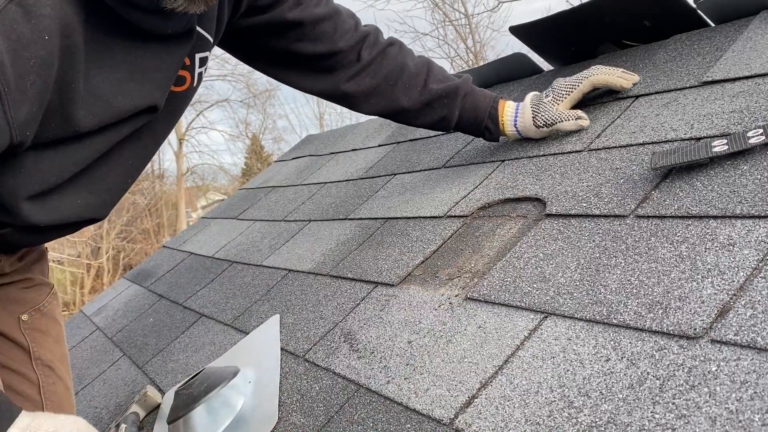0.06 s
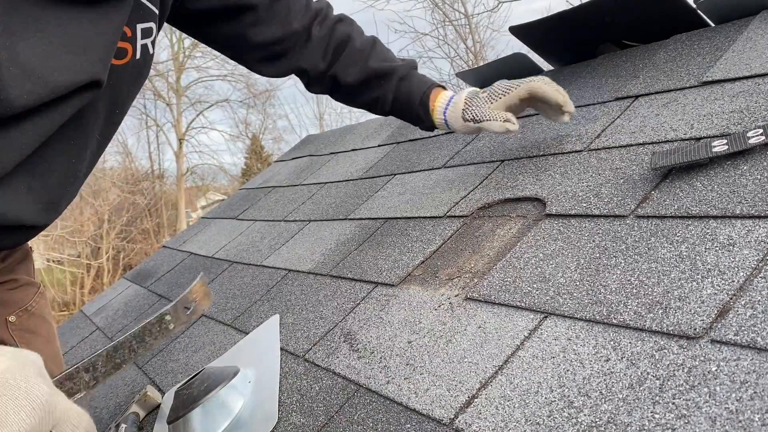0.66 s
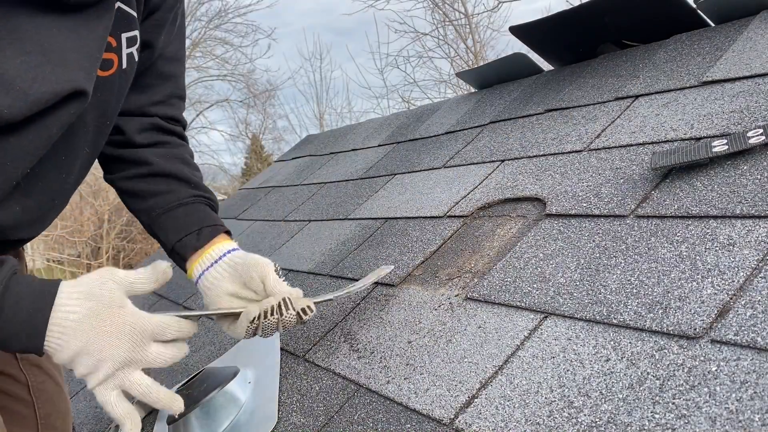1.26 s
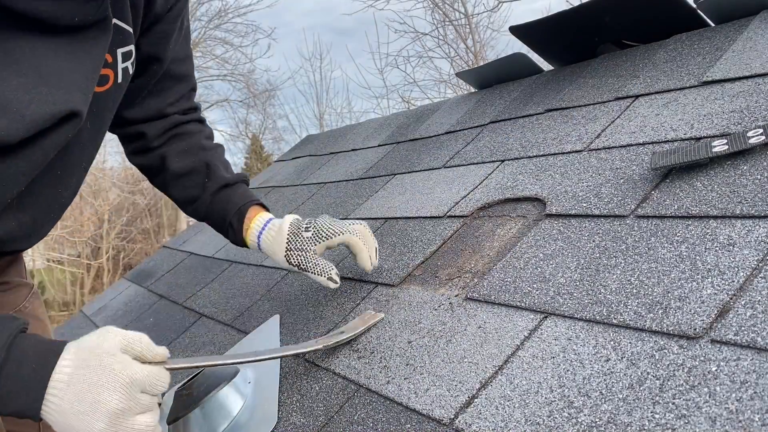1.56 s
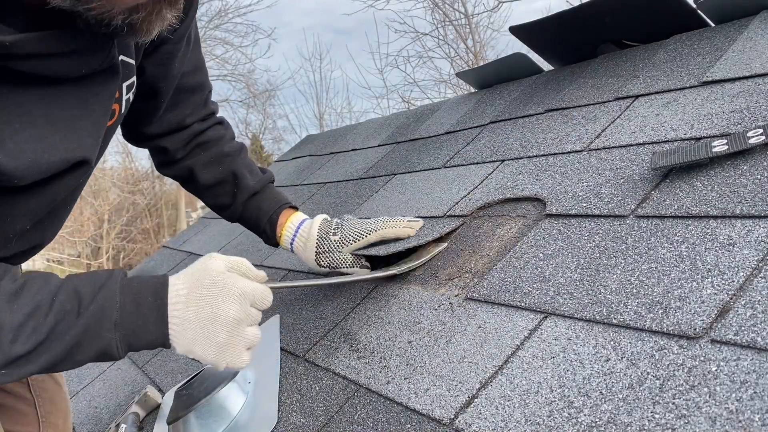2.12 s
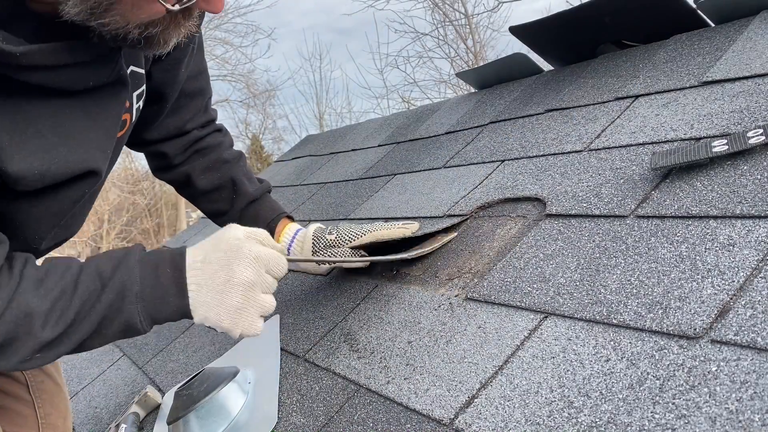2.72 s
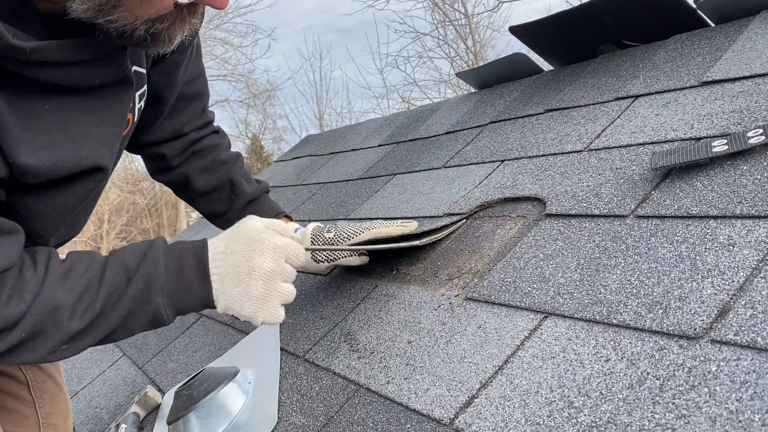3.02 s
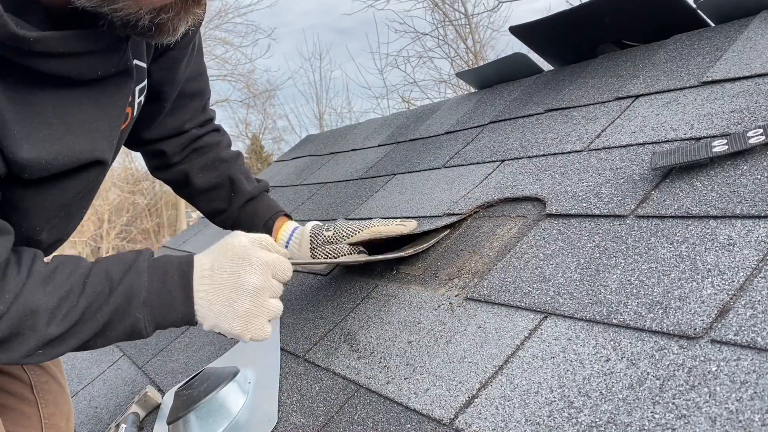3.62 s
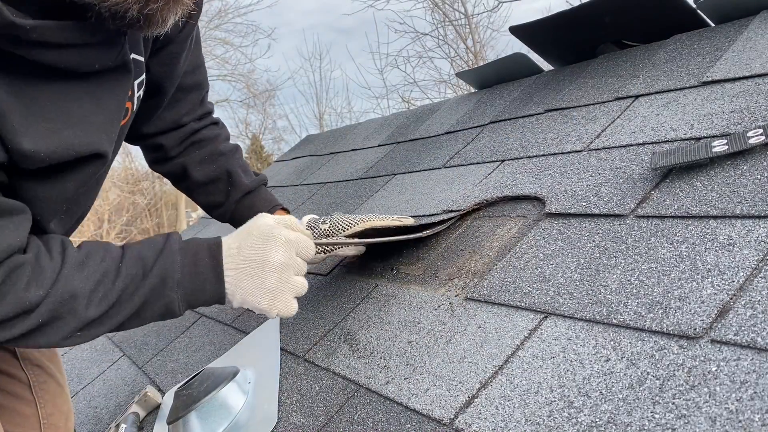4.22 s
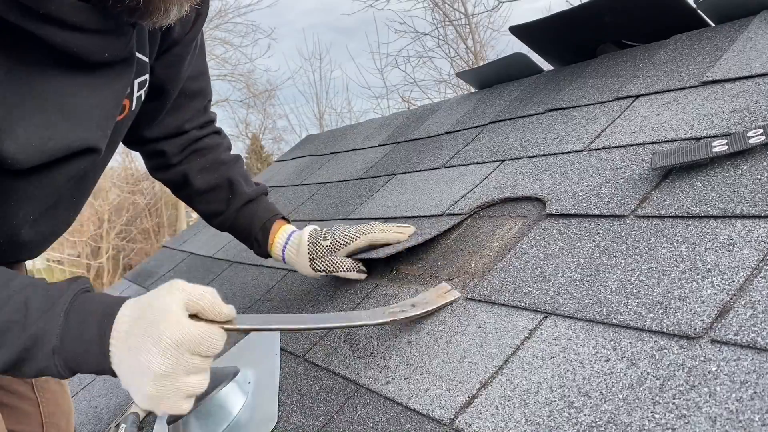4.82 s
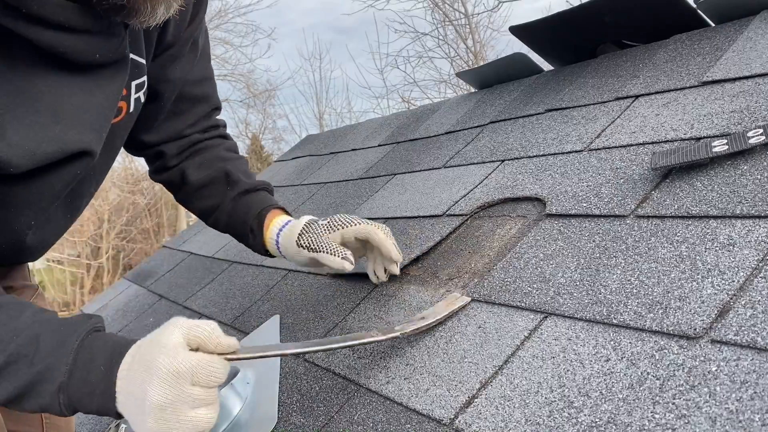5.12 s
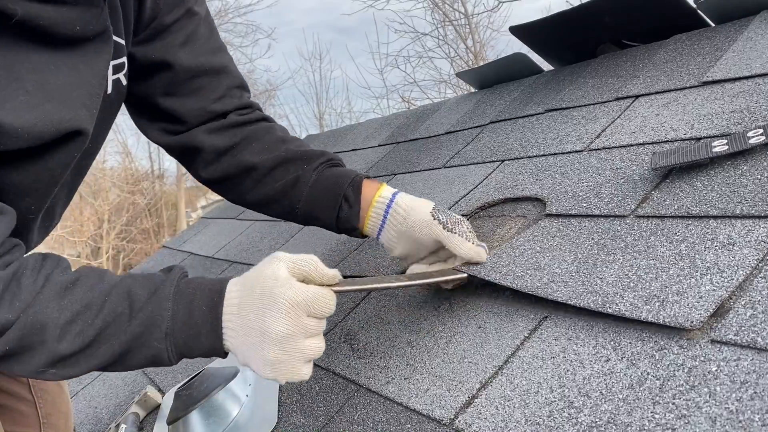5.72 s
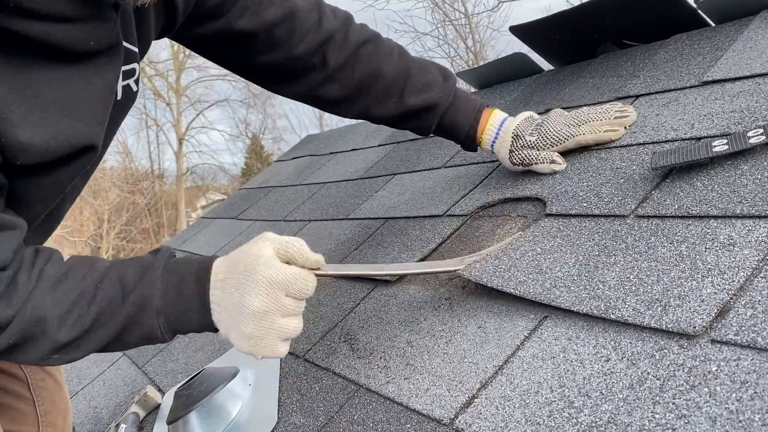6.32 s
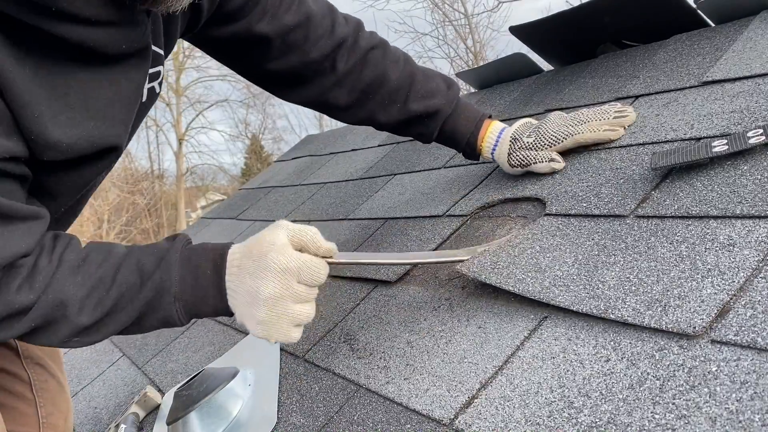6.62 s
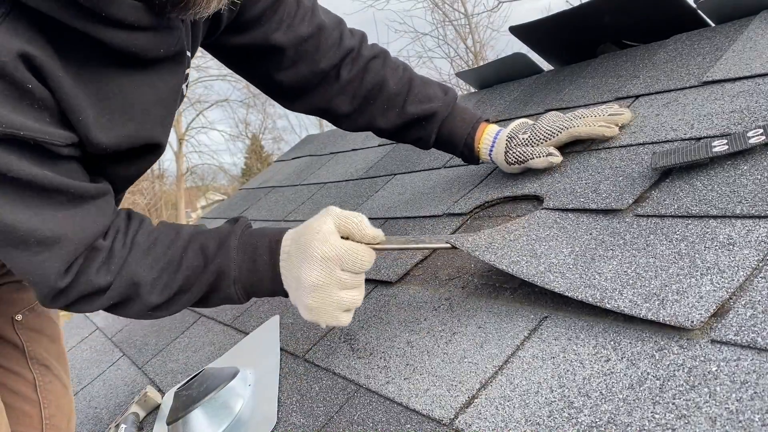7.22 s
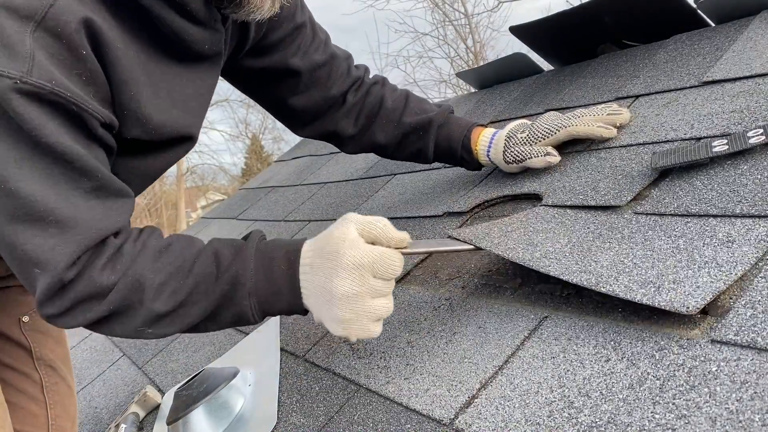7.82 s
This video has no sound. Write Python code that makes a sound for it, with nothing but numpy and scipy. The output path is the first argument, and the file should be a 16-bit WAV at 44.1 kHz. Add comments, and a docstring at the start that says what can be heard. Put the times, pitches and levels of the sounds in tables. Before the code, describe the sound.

For the first second there is only a soft sleeve rustle and a few ticking granules over a faint outdoor rumble. At about 1.3 seconds a flat steel pry bar clinks lightly onto the roof several times and starts to slide. From 2.2 seconds it is worked in and out under an asphalt shingle, close by, in short gritty strokes, about three or four pushes a second. Pushes are louder and rise in pitch; pulls are softer and fall. Sharp cracks and dull knocks break through between 2.9 and 4.5 seconds, the sharpest near 4.2, while the wooden boards thud low underneath. The scraping eases around 5 seconds, with a few bumps. From 5.5 seconds the bar rasps under a looser shingle, thinner and brighter, with more snaps near 7 and 7.5 seconds, continuing until the end at about 8 seconds.

```python
"""A sleeve rustles and stray granules tick over faint outdoor rumble; then a flat steel pry bar clinks
onto a roof and is worked in and out under one asphalt shingle and its looser neighbour, close by.
Each stroke swells and fades as granules grind by stick-slip friction and snap under the blade.
A push shortens the air pocket ahead of the tip, so its pitch rises, and loads the wooden deck;
a pull lets the pitch fall."""
import sys
import numpy as np
from scipy import signal
from scipy.fft import rfft, irfft, next_fast_len
from scipy.io import wavfile
from scipy.ndimage import uniform_filter1d

SR = 44100
rng = np.random.default_rng(int(sys.argv[2]) if len(sys.argv) > 2 else 0)


def int16_out(signal):
    """Quantize to a 16-bit WAV file."""
    q = np.round(np.clip(np.atleast_2d(signal).T, -1, 1) * 32767)
    wavfile.write(sys.argv[1], SR, q.astype(np.int16))


N = 346626
TIME = np.arange(N) / SR
ARM_TIME = TIME[::32]  # a slow clock for the arm's movements


def amp(db):
    """Decibels to amplitude gain."""
    return 10 ** (np.asarray(db) / 20)


def unit(x):
    """Normalisation to rms 1."""
    return x / np.sqrt(np.mean(x ** 2) + 1e-20)


def smooth(x, size):
    """A moving average over size samples, taken twice."""
    return uniform_filter1d(uniform_filter1d(x, size), size)


def steady(x, size):
    """Division by the running rms holds the level near 1."""
    return x / np.sqrt(abs(smooth(x ** 2, size)) + 1e-9)


def curves(rows):
    """Linear interpolation of a time table's columns at every sample."""
    times, *columns = np.transpose(rows)
    order = np.argsort(times)
    return [np.interp(TIME, times[order], column[order]) for column in columns]


def spectrum_at(points, hz):
    """Interpolation of a spectrum on a log-frequency axis."""
    frequencies, db = np.transpose(points)
    return np.interp(np.log(hz + 1), np.log(frequencies), db)


def add(mix, start_s, sound):
    """Superposition of a sound on the mix."""
    part = mix[max(round(start_s * SR), 0):][:len(sound)]
    part += sound[:len(part)]


def colour(x, points, size=2048):
    """A minimum-phase filter of unit energy imposes the shape of a spectrum."""
    log_gain = np.log(amp(spectrum_at(points, abs(np.fft.fftfreq(size, 1 / SR)))))
    response = np.exp(np.conj(signal.hilbert(log_gain)))
    taps = np.fft.ifft(response).real[:size // 2]
    return signal.oaconvolve(x, taps / np.linalg.norm(taps))[:len(x)]


def resonate(x, hz, width_hz):
    """A damped resonator of gain 1 whose frequency may glide."""
    turn = np.exp(2j * np.pi * np.cumsum(hz * np.ones(len(x))) / SR)
    pole = np.exp(-np.pi * width_hz / SR)
    return 2 * (turn * signal.lfilter([1 - pole], [1, -pole], x / turn + 1e-18)).real


def swell(crest_s, rise_s, fall_s, edge_db=-30, roundness=1.82):
    """Power envelope of a movement, at edge_db one rise before its crest and one fall after."""
    since = ARM_TIME - crest_s
    distance = abs(since / np.where(since < 0, rise_s, fall_s))
    return amp(edge_db * distance ** roundness) ** 2


def decibels(power):
    """Power on the slow clock to dB at every sample."""
    return np.interp(TIME, ARM_TIME, 10 * np.log10(power + 1e-12))


def stick_slip(per_s=10000, spread_db=2.0, clump_db=3.5, dust=0.18, lurch_db=4.0):
    """Stick-slip friction: clicks of unequal size, in quick clumps and slower lurches."""
    sizes = amp(spread_db * np.minimum(rng.exponential(1, N), 4.3)) * rng.choice([-1., 1.], N)
    clicks = unit(sizes * (rng.random(N) < per_s / SR)) + dust * rng.standard_normal(N)
    clumps = unit(smooth(rng.standard_normal(N), size=70))
    lurches = unit(smooth(rng.standard_normal(N), size=500))
    return steady(clicks * amp(clump_db * clumps), size=600) * amp(lurch_db * lurches)


# Spectrum of the open air. Each row: frequency in Hz, relative level in dB.
AIR_SPECTRUM = [(20, -14), (60, 2), (110, -14), (200, -8), (450, -22.5), (800, -21.5), (1400, -35),
                (2500, -50), (15000, -53.5)]

def outdoors(level_db=-51.5, apart=0.7):
    """Distant rumble is partly coherent between the ears: a common noise plus an opposed one."""
    common, side = (unit(colour(noise, AIR_SPECTRUM, size=8192)) for noise in rng.standard_normal((2, N)))
    return amp(level_db) * np.array([common + apart * side, common - apart * side])


# The worker's shifting weight. Each row: time in seconds, load on the boards in dB.
LEANING = [(0, -45.5), (.38, -40.5), (.5, -51.5), (1.3, -52.5), (1.5, -37), (1.8, -41), (1.95, -29.5),
           (2.12, -41.5), (2.35, -48), (4.6, -49.5), (4.85, -26.5), (5.05, -45.5), (5.5, -42.5),
           (5.68, -35.5), (5.95, -51), (6.7, -43), (7.1, -49), (7.86, -41.5)]
# A knee or hand comes down. Each row: crest in seconds, load in dB.
THUDS = [(0.205, -38.5), (1.367, -35), (1.5, -29.5), (4.02, -24), (4.264, -28.5), (5.131, -34.5)]

def deck_load(push_lag_s=0.01, pull_lag_s=0.047, stretch=1.295):
    """Incoherent sources add in power: weight, strokes and thuds give the load on the boards in dB."""
    power = amp(np.interp(ARM_TIME, *np.transpose(LEANING))) ** 2
    # the boards answer later and for longer than the blade
    for strokes, lag_s in ((PUSHES, push_lag_s), (PULLS, pull_lag_s)):
        for s, rise, fall, _, _, db in strokes:
            power += amp(db) ** 2 * swell(s + lag_s, rise * stretch, fall * stretch)
    thuds = sum(amp(db) ** 2 * swell(s, rise_s=0.075, fall_s=0.026) for s, db in THUDS)
    return decibels(power + thuds)


# Modes of the roof boards. Each row: frequency in Hz, bandwidth in Hz, relative gain in dB.
DECK_MODES = [(60.7, 37.2, 0), (95, 48.4, 4), (154.7, 91, -1), (201.2, 65, -11.5)]

def deck(load_db, trim_db=1.96, lowest_hz=36, jolts_per_s=70, creep=0.48, hardening=0.28):
    """Forced vibration: uneven jolts shake the boards, and harder shoves reach their higher modes."""
    jolts = unit(rng.standard_normal(N) * (rng.random(N) < jolts_per_s / SR))
    force = jolts + creep * rng.standard_normal(N)
    step_db = hardening * np.maximum(load_db + 27, -20)
    boards = sum((-1) ** k * amp(db + k * step_db) * resonate(resonate(force, hz, width), hz, width)
                 for k, (hz, width, db) in enumerate(DECK_MODES))
    rumble = amp(load_db + trim_db) * steady(boards, size=1300)
    return signal.sosfilt(signal.butter(2, lowest_hz, "high", fs=SR, output="sos"), rumble)


# A granule pings off the roof. Each row: start in seconds, impulse strength in dB.
PINGS = [(0.075, -37), (0.635, -46), (0.655, -40), (0.715, -35), (0.956, -26), (1.128, -37), (3.017, -27),
         (3.3, -23)]

def loose_granules(grind_db, per_s=45, tick_db=-42, idle_db=-11):
    """Granules break off and skitter as a Poisson train of impacts, louder while the bar works."""
    activity_db = np.interp(grind_db, [-70, -40], [idle_db, 0])
    sizes = amp(tick_db + activity_db + 6 * np.minimum(rng.exponential(1, N), 3))
    ticks = sizes * (rng.random(N) < per_s / SR)
    for s, db in PINGS:
        add(ticks, s, amp([db]))
    return colour(ticks, [(700, -28), (2500, -15), (7000, 4), (15000, 4)])


# A sleeve brushes past. Each row: crest, rise and fall in seconds, level in dB.
RUSTLES = [(0.21, 0.096, 0.46, -67), (0.275, 0.025, 0.032, -54), (0.53, 0.25, 0.21, -62.5),
           (0.603, 0.073, 0.026, -50.5), (1.12, 0.17, 0.3, -63.5)]
# Spectrum of rubbing cloth. Each row: frequency in Hz, relative level in dB.
CLOTH_SPECTRUM = [(300, -23), (1500, -0.5), (4000, 0), (7500, 0.5), (9000, 2), (11500, 1.5), (13300, 3),
                  (15000, -4.5)]

def sleeve():
    """Friction between fibres, which catch and slip, makes a thin, bright rustle."""
    level_db = decibels(sum(amp(db) ** 2 * swell(s, rise, fall) for s, rise, fall, db in RUSTLES))
    fibres = stick_slip(per_s=15000, clump_db=2.0, lurch_db=3.5)
    return amp(level_db) * colour(fibres, CLOTH_SPECTRUM)


# The bar's heel or a hand bumps the shingle. Each row: start in seconds, relative peak in dB.
KNOCKS = [(0.316, -32.5), (1.35, -32.5), (1.396, -32), (1.627, -20), (1.665, -19.5), (1.713, -12),
          (2.181, -22), (2.219, -16), (2.545, -17), (2.895, -12), (3.183, -9), (3.76, -19), (4.007, -10),
          (4.765, -40.5), (4.842, -15.5), (4.915, -17.5), (5.123, -33.5), (5.291, -24)]

def knocks(decay_s=0.0069, trim_db=-3, size=3000):
    """A heavily damped impact: the shingle and the board under it give a dull bump."""
    out, t = np.zeros(N), np.arange(size) / SR
    for s, db in KNOCKS:
        bump = colour(rng.standard_normal(size) * np.exp(-t / decay_s), FLEX_SPECTRUM)
        add(out, s, amp(db + trim_db) * bump / abs(bump).max())
    return out


# The blade jumps a ridge or the tar seal lets go. Each row: start in seconds, relative peak in dB.
SNAPS = [(0.317, -32.5), (0.374, -34.5), (1.713, -18), (2.52, -23), (2.937, -3.5), (2.97, -13),
         (3.063, -20), (3.193, -14), (3.22, -8), (3.235, -6), (3.248, -17), (3.468, -14), (3.718, -18),
         (3.751, -7.5), (3.952, -20), (4.007, -7), (4.213, 0), (4.222, -19), (4.415, -22), (4.483, -6.5),
         (5.123, -33.5), (5.166, -36), (5.474, -12.5), (5.68, -27), (5.869, -17), (5.995, -22),
         (6.173, -26), (6.265, -18.5), (6.291, -18.5), (6.412, -19), (6.998, -5.5), (7.025, -18.5),
         (7.174, -21.5), (7.236, -13.5), (7.463, -12.5), (7.485, -9), (7.728, -21)]

def snaps(fracture_s=0.0013, crumble_s=0.007, crumble_db=-17, pocket_db=5, trim_db=1.5, size=2000):
    """Sudden release of strain: a crack and a short crumble, coloured by the air pocket at the tip."""
    out, t = np.zeros(N), np.arange(size) / SR
    pocket_hz = pocket_pitch()
    envelope = np.exp(-t / fracture_s) + amp(crumble_db) * np.exp(-t / crumble_s)
    for s, db in SNAPS:
        crack = colour(rng.standard_normal(size) * envelope, FIRST_SHINGLE)
        crack += amp(pocket_db) * resonate(crack, pocket_hz[round(s * SR)], width_hz=1700)
        add(out, s, amp(db + trim_db) * crack / abs(crack).max())
    return out


# Modes of the free bar. Each row: frequency in Hz, relative level in dB, 60 dB decay time in seconds.
BAR_MODES = [(2821, -19, .12), (3600, -22, .1), (5254, -19, .16), (6126, -20, .1), (7854, -19, .13),
             (9722, -18, .12), (10910, 0, .24), (11880, -13, .17), (14890, -4, .06)]

def bar_ring(damping, size=12000):
    """The steel's impulse response is a sum of decaying modes; damping multiplies their decay rates."""
    t = np.arange(size) / SR
    return sum(amp(db) * np.exp(-np.log(1000) * t * damping / t60) * np.sin(2 * np.pi * hz * t)
               for hz, db, t60 in BAR_MODES)


# The bar taps the roof. Each row: start in seconds, relative level in dB.
CLINKS = [(1.322, -44), (1.3478, -30), (1.386, -32), (1.3938, -20), (1.4884, -24), (1.5227, -16.5),
          (1.5592, -18.5), (1.5868, -26)]

def clinks(tick_db=-2, tick_s=0.003, trim_db=-4, pressed_from_s=1.45):
    """Each impact ticks and sets the bar in free vibration; once it is pressed down, contact damps it."""
    out = np.zeros(N)
    for s, db in CLINKS:
        ring = bar_ring(damping=9 if s > pressed_from_s else 1)
        t = np.arange(len(ring)) / SR
        tick = colour(rng.standard_normal(len(t)) * np.exp(-t / tick_s), FIRST_SHINGLE)
        clink = ring / abs(ring).max() + amp(tick_db) * tick / abs(tick).max()
        add(out, s, amp(db + trim_db) * clink)
    return out


# The bar is shoved in. Each row: crest, rise and fall in seconds, grinding level in dB,
# nominal pocket pitch at the crest in Hz, load on the boards in dB.
PUSHES = [(1.701, 0.17, 0.2, -36, 1310, -29), (1.875, 0.11, 0.031, -35, 3520, -33),
          (2.248, 0.089, 0.045, -27, 2180, -29.5), (2.578, 0.073, 0.048, -20, 1530, -23),
          (2.944, .11, 0.042, -19, 1900, -25), (3.231, 0.08, 0.048, -23.5, 1570, -23),
          (3.478, 0.045, 0.017, -22.5, 2480, -25), (3.749, 0.051, 0.032, -20, 2750, -29.5),
          (4.001, 0.079, 0.057, -22.5, 1425, -22), (4.218, .024, 0.074, -24.5, 1526, -30.5),
          (4.467, 0.027, 0.087, -21.5, 1530, -24), (4.748, 0.14, 0.14, -25, 1500, -31),
          (5.56, 0.14, 0.071, -29, 2590, -48), (5.879, 0.062, 0.04, -21.5, 3400, -32.5),
          (6.191, 0.073, 0.036, -24, 3370, -27), (6.426, 0.042, 0.055, -21, 3360, -24),
          (6.716, 0.11, .057, -28.5, 2340, -30.5), (6.956, 0.034, 0.047, -28.5, 1980, -30.5),
          (7.241, 0.035, 0.042, -26, 2720, -40.5), (7.504, 0.13, 0.039, -22, 3200, -33.5),
          (7.788, 0.11, 0.042, -26, 2450, -31)]
# The bar is drawn back. Each row: as for a push.
PULLS = [(2.06, 0.16, 0.18, -43.5, 2100, -43), (2.404, .1, 0.13, -34, 1460, -36.5),
         (2.733, 0.082, 0.095, -30, 1450, -34), (3.069, 0.066, 0.092, -32.5, 1650, -28.5),
         (3.389, 0.097, 0.069, -33.5, 1460, -37.5), (3.623, 0.049, 0.054, -27.5, 1620, -33.5),
         (3.853, 0.051, 0.1, -33.5, 2010, -32.5), (4.153, 0.077, .055, -44.5, 1550, -61),
         (4.421, 0.093, 0.037, -31, 1530, -55), (4.624, 0.035, 0.043, -33, 1520, -55),
         (4.928, 0.034, 0.029, -31.5, 1492, -33), (5.296, 0.058, 0.12, -36.5, 1480, -29.5),
         (5.45, 0.12, 0.077, -40, 1720, -35.5), (5.732, 0.066, 0.079, -32, 2020, -39),
         (6.023, 0.044, 0.079, -22.5, 2540, -30), (6.296, 0.043, 0.07, -30, 2680, -29.5),
         (6.564, 0.061, 0.084, -39, 1870, -33), (6.828, 0.079, 0.18, -32, 2180, -41),
         (7.132, 0.18, 0.053, -41.5, 2270, -46), (7.356, 0.11, 0.18, -36.5, 2460, -31),
         (7.617, 0.068, 0.11, -28.5, 2100, -29), (7.85, 0.011, .08, -33.5, 2360, -42)]

def grind_level(resting_db=-64.5):
    """Strokes add in power, over a faint stirring once the blade has touched the roof; gives dB."""
    strokes = sum(amp(db) ** 2 * swell(s, rise, fall) for s, rise, fall, db, *_ in PUSHES + PULLS)
    touching = ARM_TIME > CLINKS[0][0]
    return decibels(strokes + amp(resting_db) ** 2 * touching)


def pocket_pitch(push_m=0.094, pull_m=0.055, gap_limits_m=(0.018, 0.084), jerk_share=0.11, jerk_s=0.011):
    """A quarter-wave resonator that a push shortens and a pull lengthens; the strongest stroke leads."""
    hz_metres = 343 / 4  # a quarter of the speed of sound
    quickest_s = 0.16  # a briefer stroke is a shorter jab, not a faster one
    gaps, weights = [], []
    for strokes, travel_m in ((PUSHES, -push_m), (PULLS, pull_m)):
        for s, rise, fall, db, hz, _ in strokes:
            speed = travel_m / max(rise + fall, quickest_s)
            gaps.append(np.clip(hz_metres / hz + speed * (ARM_TIME - s), *gap_limits_m))
            weights.append(amp(db) ** 2 * swell(s, rise, fall) + 1e-20)
    # the tip advances in jerks, so the pocket's length trembles
    jerks = np.interp(ARM_TIME / jerk_s, np.arange(len(ARM_TIME)), rng.standard_normal(len(ARM_TIME)))
    gap = np.average(gaps, axis=0, weights=weights) * np.exp(jerk_share * jerks)
    return np.interp(TIME, ARM_TIME, hz_metres / gap)


# Grinding under the first shingle and the looser second. Each row: frequency in Hz, relative level in dB.
FIRST_SHINGLE = [(150, -7), (500, -11.5), (800, -4.5), (1100, -8), (1350, -4.5), (2000, -2.5), (3200, -3.5),
                 (4600, -5), (5300, -11), (6400, -6.5), (8500, -10), (10500, -7.5), (13000, -11.5),
                 (15700, -15.5)]
SECOND_SHINGLE = [(150, -41), (500, -13.5), (800, -7), (1300, -3), (2000, 0.5), (2700, 2), (4000, -2),
                  (5600, -5), (6800, -4), (8500, -8.5), (11000, -7.5), (13000, -13.5), (15700, -12)]
# Modes of bar and shingle pressed together. Each row: frequency in Hz, bandwidth in Hz, gain in dB.
PRESSED_MODES = [(940, 79, -8), (1415, 115, 4), (2710, 47, -24), (6680, 130, -28)]
# How the blade lies. Each row: time in seconds, then relative levels in dB of the pocket's resonance,
# the steel's ring and the shingle's groan.
BLADE_CONTACT = [(1.3, -25, -10, -20.5), (1.55, -25, -5, -2), (1.7, -40, 0, -1.5), (1.87, 4, -9, -14),
                 (1.95, -18, -18, -19), (2.25, -10, -9, -10.5), (2.9, -5, -8, -3.5), (3.6, -7.5, -8, -6.5),
                 (4.05, 0, -12, -2.5), (4.5, -25, -15, -4.5), (4.85, -8, -1, -4.5), (5.05, -13, -7, -6.5),
                 (5.3, -11.5, 0.5, -3.5), (5.55, 5.5, -9, -23), (6.4, 0.5, -11, -11),
                 (6.75, -11.5, -11, -8), (7.8, -14, -11, -11)]

def grinding(level_db, on_second, tight_width_hz=560, loose_width_hz=1300, body_db=-9, trim_db=0.4):
    """Source and filter: granule clicks sound through the shingle, the air pocket and the gripped bar."""
    pocket_db, ring_db, _ = curves(BLADE_CONTACT)
    clicks, pocket_hz = stick_slip(), pocket_pitch()
    on_first = 1 - on_second
    sheet = on_first * colour(clicks, FIRST_SHINGLE) + on_second * colour(clicks, SECOND_SHINGLE)
    # the looser shingle leaks more, so its pocket resonance is broader
    tight, loose = (unit(resonate(resonate(clicks, pocket_hz, width), pocket_hz, width))
                    for width in (tight_width_hz, loose_width_hz))
    pocket = on_first * tight + on_second * loose
    body = unit(sum(amp(db) * resonate(clicks, hz, width) for hz, width, db in PRESSED_MODES))
    choke_db = 0.64 * np.maximum(level_db + 32, 0)  # hard pressure chokes the ring
    steel = amp(ring_db - choke_db) * unit(signal.oaconvolve(clicks, bar_ring(damping=11))[:N])
    bar = on_first * (amp(body_db) * body + steel)  # deep under the second shingle the bar is muffled
    return amp(level_db + trim_db) * steady(sheet + amp(pocket_db) * pocket + bar, size=2500)


# Spectrum of the flexing shingle. Each row: frequency in Hz, relative level in dB.
FLEX_SPECTRUM = [(150, -21.5), (270, -6.5), (365, 2), (460, -4), (650, -7.5), (900, -14), (1500, -32.5),
                 (4000, -62)]

def groan(grind_db, load_db):
    """Coarse slips drive flexural vibration of the shingle when the blade both slides and bears down."""
    _, _, contact_db = curves(BLADE_CONTACT)
    flexing = colour(stick_slip(per_s=1500, spread_db=3.5), FLEX_SPECTRUM)
    return amp((grind_db + load_db) / 2 + contact_db) * steady(flexing, size=800)


def edge_grit(grind_db, side_db=-13):
    """An extended source: grit breaks along the blade's width, so part of it differs between the ears."""
    spectrum = [(150, -29), (400, 1.5), (1200, 7.0), (3000, 2.5), (5500, 6.5), (7500, -23), (15000, -19)]
    return amp(grind_db + side_db) * colour(stick_slip(), spectrum)


def roof_echo(x, near_db=-16, near_s=0.0042, far_db=-35, far_s=0.11, cutoff_hz=7500, size=8000):
    """Early reflections from the roof and the worker's body, then a faint open-air tail."""
    t = np.arange(size) / SR
    near, far = (rng.standard_normal((2, size)) * np.exp(-t / decay_s) * (t > .0005)
                 for decay_s in (near_s, far_s))
    near = amp(near_db) * near / np.linalg.norm(near, axis=1, keepdims=True)
    far = amp(far_db) * far / np.linalg.norm(far[0])
    taps = signal.lfilter(*signal.butter(2, cutoff_hz, fs=SR), near + far)
    return signal.oaconvolve(x[None], taps, axes=1)[:, :N]


# Level difference at each shingle. Each row: frequency in Hz, excess of left over right in dB.
FIRST_BALANCE = [(60, 2.5), (400, -0.2), (1000, 3), (2500, 1), (7000, 0.7), (15000, 0)]
SECOND_BALANCE = [(60, 0), (700, 3), (1300, 0.5), (2400, 4), (4500, 9), (6200, 0), (8500, 0.5)]
# Phase difference at each shingle. Each row: frequency in Hz, lead of the right port in radians.
FIRST_PHASE = [(0, 0), (7000, 0), (15500, 12.57)]
SECOND_PHASE = [(0, 0), (1300, .55), (2900, 0), (4300, .3), (6200, 6), (7000, 6.28), (15500, 18.85)]

def ports(x, balance, phase):
    """Two microphone ports receive the sound with frequency-dependent level and phase differences."""
    size = next_fast_len(N + 2048)
    hz = np.fft.rfftfreq(size, 1 / SR)
    tilt = amp(spectrum_at(balance, hz) / 2)
    lead = np.interp(hz, *np.transpose(phase))
    response = np.array([tilt, np.exp(1j * lead) / tilt])
    return irfft(rfft(x, size) * response, size)[:, :N]


def scene(second_shingle_s=5.4, crossfade_s=0.07):
    """The sources superpose as the bar works under one shingle, then moves to its neighbour."""
    grind_db, load_db = grind_level(), deck_load()
    on_second = np.clip((TIME - second_shingle_s) / crossfade_s + .5, 0, 1)
    blade = grinding(grind_db, on_second) + snaps() + clinks() + knocks()
    blade += loose_granules(grind_db) + groan(grind_db, load_db)
    side = edge_grit(grind_db) + amp(-19) * deck(load_db)  # the wide deck does not move as one piece
    work = blade + roof_echo(blade) + sleeve() + deck(load_db) + np.array([side, -side])
    first = ports(work * (1 - on_second), FIRST_BALANCE, FIRST_PHASE)
    second = ports(work * on_second, SECOND_BALANCE, SECOND_PHASE)
    return first + second + outdoors()


def record(dry, ceiling=0.85, cutoff_hz=15950):
    """Soft saturation rounds the loudest cracks; a low-pass filter then limits the band."""
    rounded = ceiling * np.tanh(dry / ceiling)
    lowpass = signal.firwin(401, cutoff_hz, window=("kaiser", 8), fs=SR)
    return signal.oaconvolve(rounded, lowpass[None], "same")


dry = scene()
out = record(dry)
int16_out(out)
```